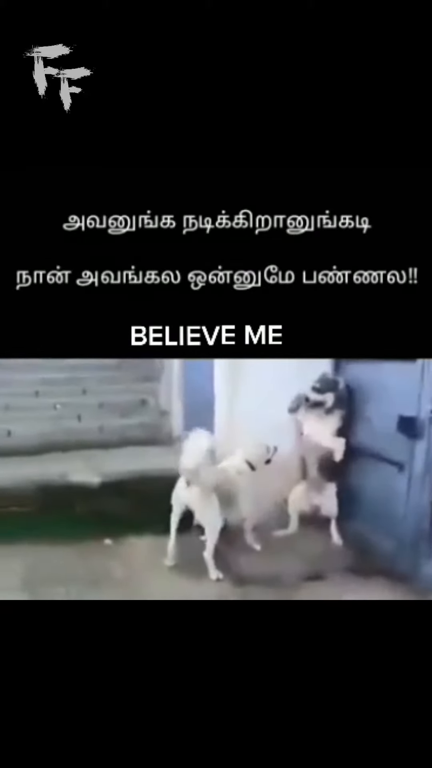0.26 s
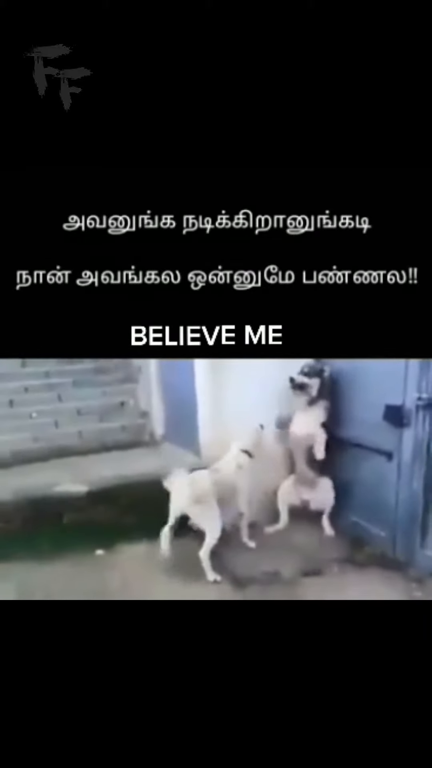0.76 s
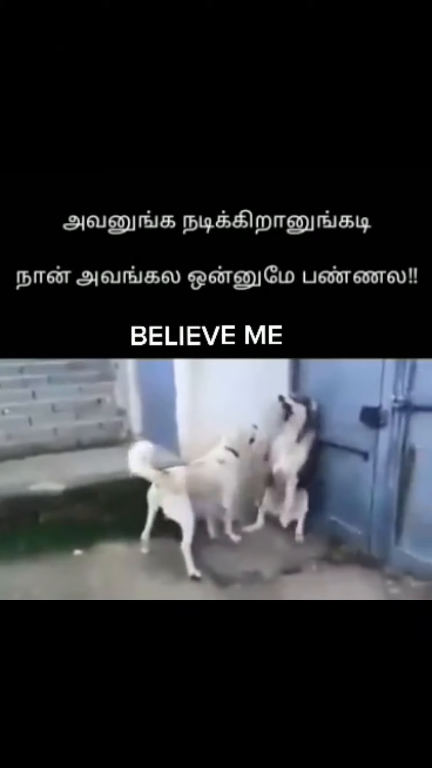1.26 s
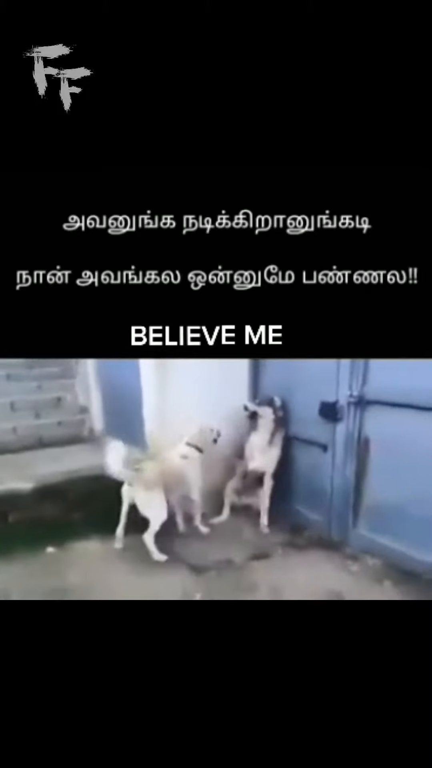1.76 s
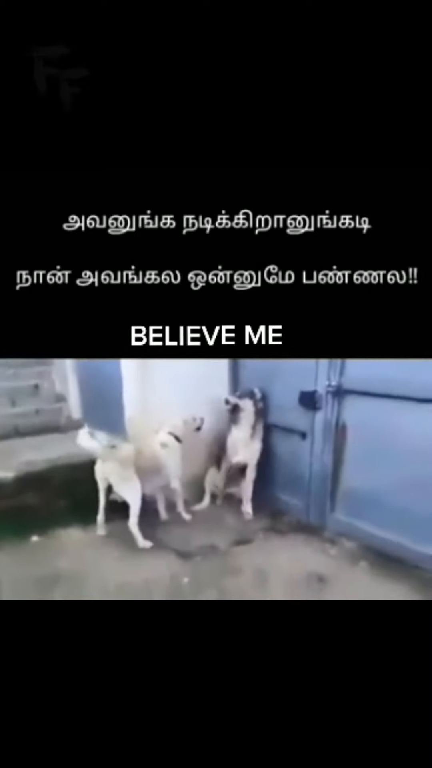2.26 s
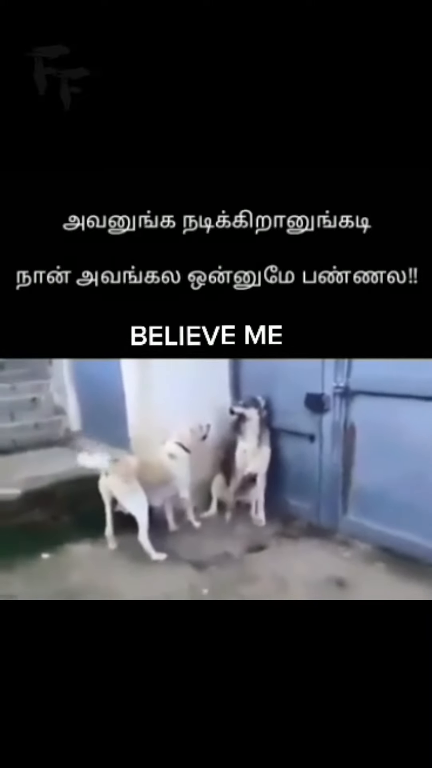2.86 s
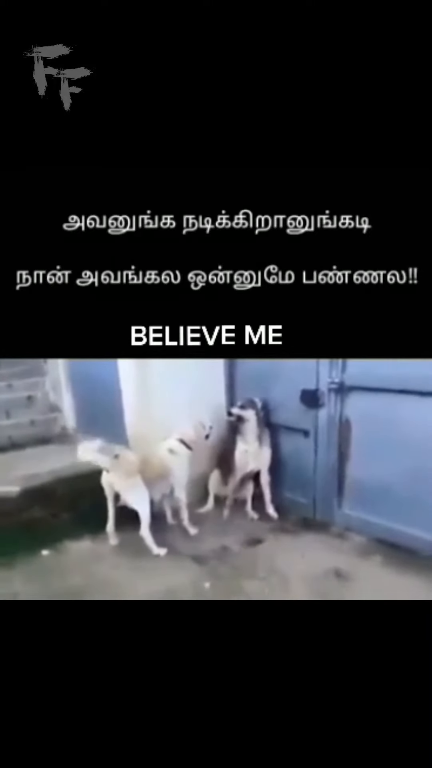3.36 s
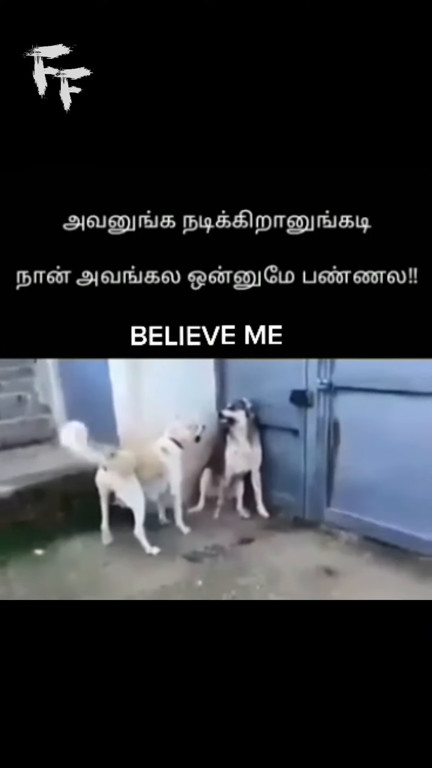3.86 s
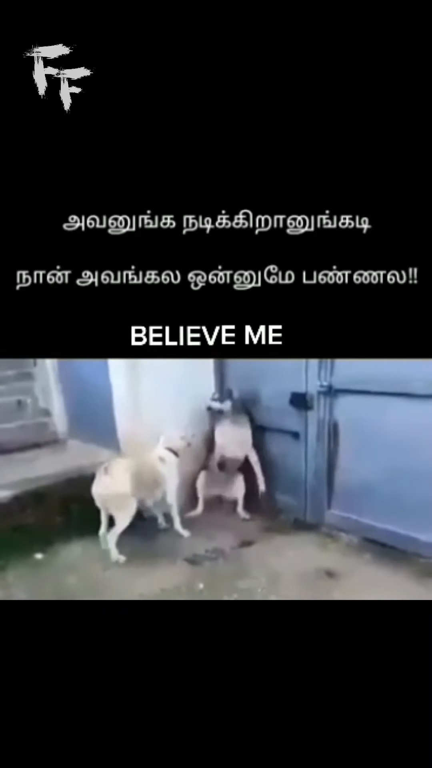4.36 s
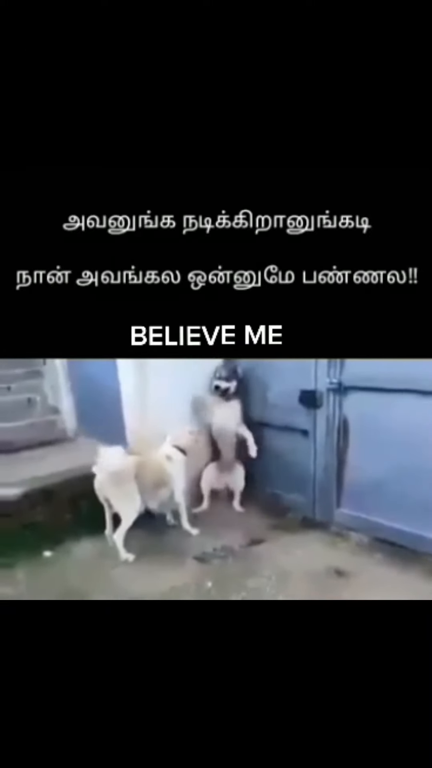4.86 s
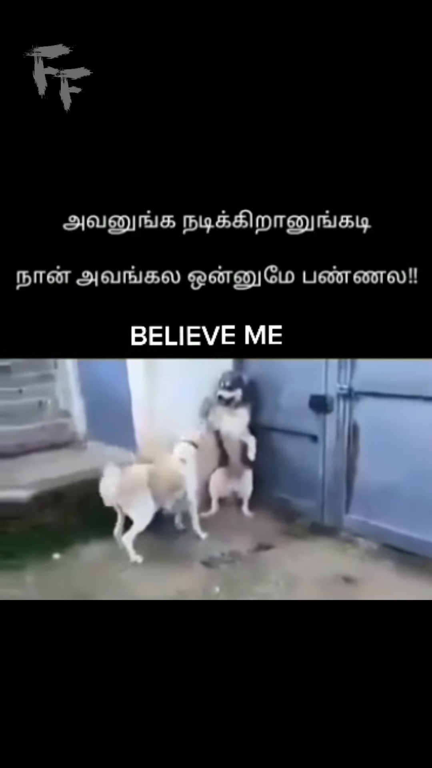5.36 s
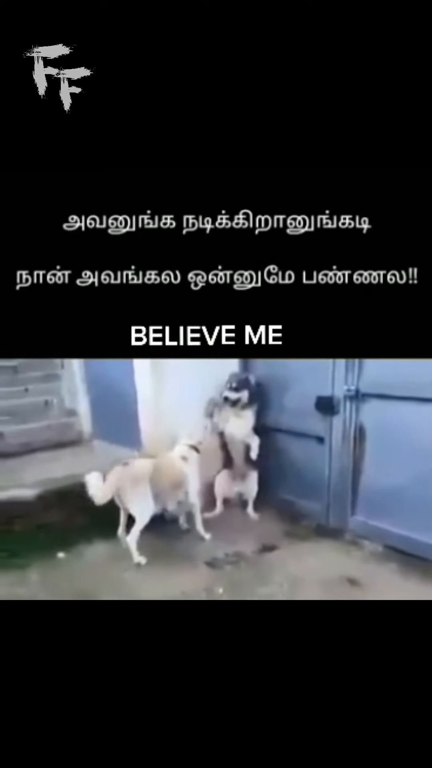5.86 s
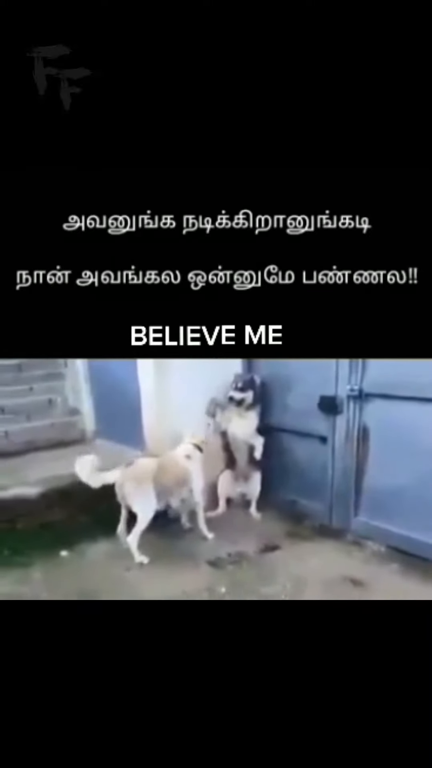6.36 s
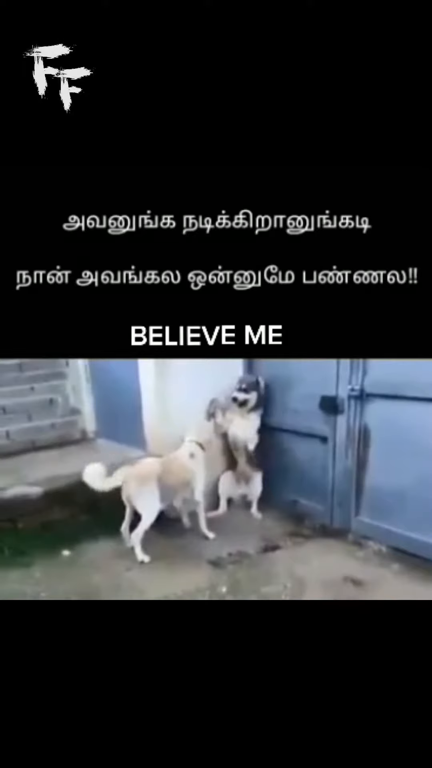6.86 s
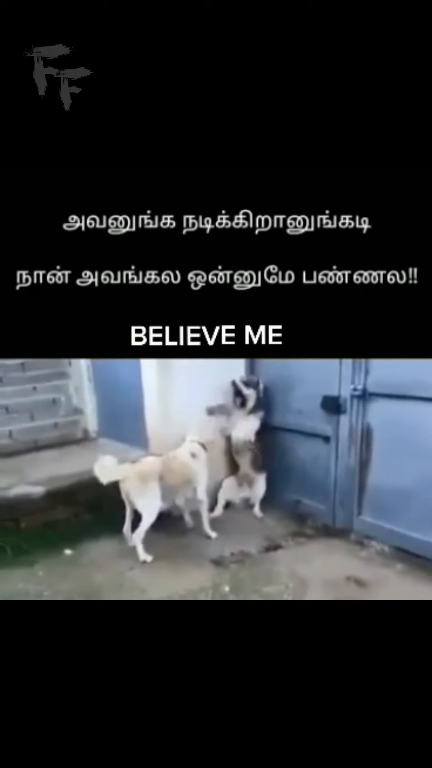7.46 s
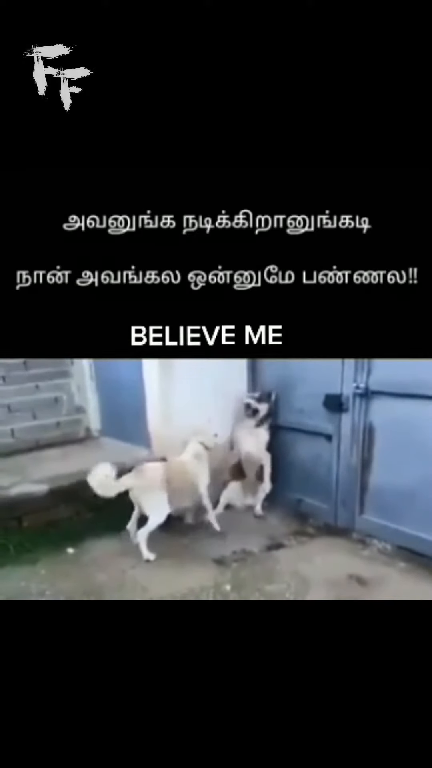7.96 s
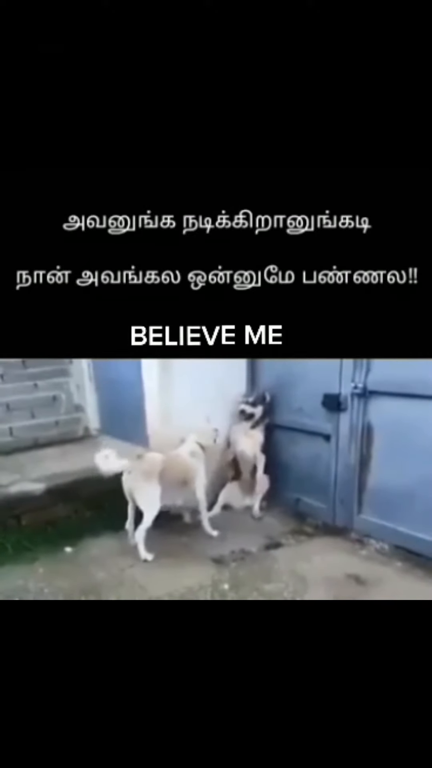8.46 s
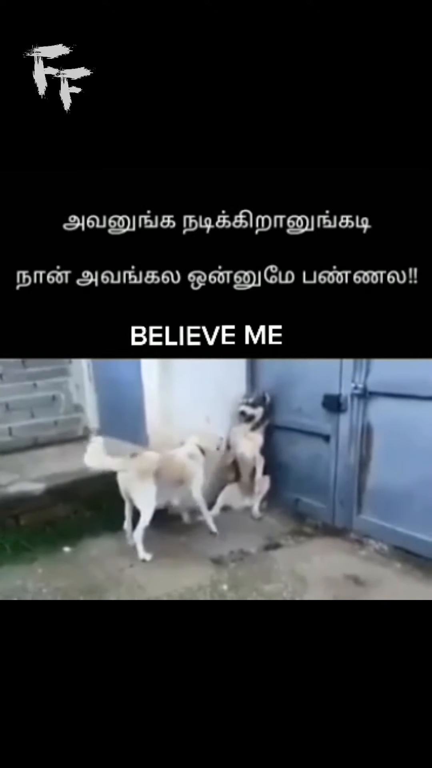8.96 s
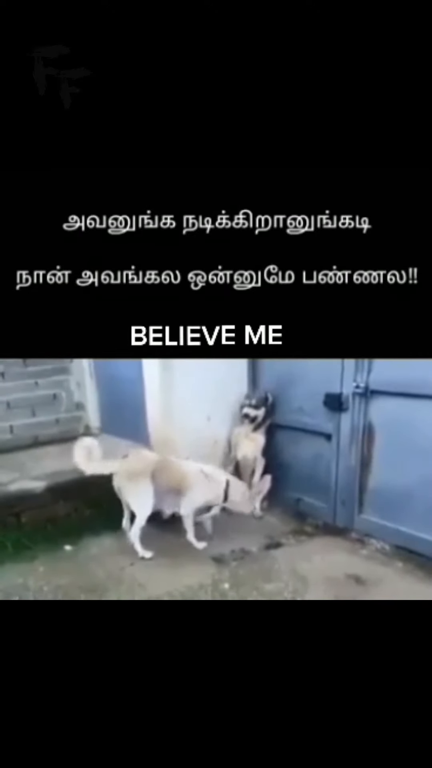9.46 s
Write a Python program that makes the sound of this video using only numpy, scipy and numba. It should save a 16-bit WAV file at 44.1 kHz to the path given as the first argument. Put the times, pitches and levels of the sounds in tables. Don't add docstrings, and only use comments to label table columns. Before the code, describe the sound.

A cornered dog squeals and barks hoarsely while an attacker snarls without pause and fires loud, clipped barks, captured on an overloaded phone.

```python
import sys
import numpy as np
from scipy import signal
from scipy.fft import rfft, irfft
from scipy.io import wavfile
from scipy.ndimage import uniform_filter1d, minimum_filter1d
from numba import njit

SR = 44100
rng = np.random.default_rng(int(sys.argv[2]) if len(sys.argv) > 2 else 0)


def linear_from_db(decibels):
    return 10 ** (np.asarray(decibels, float) / 20)


def wav_out(sig):
    wavfile.write(sys.argv[1], SR, np.round(np.clip(np.atleast_2d(sig).T, -1, 1) * 32767).astype(np.int16))


N = 429086

# start_s, peak_db
TICKS = [
    (1.791, -52),
    (6.009, -50),
    (7.531, -50.5),
]
# start_s, length_s, snarl_db, teeth_hiss_db
BREATHS = [(0.0, 0.22, -39.5, -40), (0.277, 0.13, -46.5, -38), (0.434, 0.11, -38, -37),
           (0.563, 0.084, -39.5, -45), (0.96, .19, -34.5, -31.5), (1.323, 0.24, -34, -33),
           (1.684, 0.51, -44.5, -52.5), (1.962, 0.24, -40.5, -40), (2.228, 0.17, -44, -58),
           (2.413, 0.2, -42, -43.5), (2.656, 0.092, -45.5, -47.5), (2.809, 0.15, -39.5, -41.5),
           (3.338, 0.22, -42, -42), (3.7, 0.18, -43.5, -48.5), (3.926, 0.3, -42.5, -41.5),
           (4.593, 0.04, -38, -35), (4.868, 0.33, -40.5, -47), (5.248, 0.25, -38.5, -45),
           (5.708, 0.18, -36, -36.5), (6.0, 0.49, -42.5, -39.5), (6.815, 0.24, -37, -38.5),
           (7.1, 0.15, -45, -45.5), (7.225, 0.21, -42, -41), (7.491, 0.34, -41.5, -48),
           (7.962, 0.27, -33, -37.5), (8.183, 0.11, -32.5, -47), (8.6, 0.18, -46.5, -47.5),
           (8.758, 0.18, -40, -37.5), (8.974, 0.28, -43, -43), (9.557, 0.17, -45.5, -49)]
# time_s, level_db
CHEST = [(0.0, -40), (0.19, -44), (1.22, -43), (1.81, -44.5), (2.27, -38), (3.55, -47), (4.09, -40),
         (5.04, -43), (5.39, -27), (5.83, -40.5), (6.45, -39.5), (7.02, -45.5), (7.67, -31.5), (8.1, -44.5),
         (8.97, -33.5), (9.73, -45)]
# time_s, pitch_hz, level_db
HUMS = [
    [(2.0, 98.77, -48), (2.116, 97.5, -46), (2.344, 86.82, -37), (2.404, 80.1, -43), (2.506, 80.15, -46),
     (2.62, 65.8, -37)],
    [(4.95, 152, -45), (5.003, 152.2, -39.5), (5.196, 109.6, -38.5), (5.362, 118.6, -29.5),
     (5.534, 95.01, -32), (5.6, 102.8, -51)],
    [(7.35, 76.7, -40), (7.564, 78.8, -46.5), (7.66, 100.1, -28), (7.75, 101.2, -37)],
    [(8.33, 116.4, -33), (8.408, 106.4, -41.5), (8.566, 106.4, -38), (8.752, 82, -44), (8.966, 78.2, -43.5),
     (9.0, 83.4, -39)],
]
# centre_hz, width_hz, level_db
SNARL_THROAT = [(539, 224, 6), (985, 600, 4), (1760, 1070, 0)]
# centre_hz, width_hz, level_db
SNARL_TEETH = [(2257, 138, -1), (2670, 200, 1.5), (3106.6, 1340, -5.5), (3712, 990, -3.5), (4420, 1000, -9)]
# time_s, pitch_hz, level_db, octave_rel_db
YELPS = [
    [(0.095, 1403, -28, -8), (0.136, 1770, -15, -8), (0.145, 1820, -22, -5), (0.162, 1885, -9.5, -13),
     (0.192, 1888, -12, -14), (0.203, 1860, -23, -6), (0.231, 1745, -14, -13), (0.254, 1610, -20, -12),
     (0.295, 1760, -58, -15)],
    [(0.31, 1545, -35, -18), (0.336, 1494, -26.5, -27), (0.395, 1490, -44, -17)],
    [(0.785, 1634, -28.5, -13.5), (0.851, 2027, -8, -3.5), (0.875, 1890, -40.5, -10)],
    [(1.335, 1603, -44, 5), (1.365, 1603, -36.5, 7), (1.415, 1922, -19.5, -10), (1.432, 1768, -24, -1.5),
     (1.47, 1745, -35.5, 0.5)],
]
# start_s, length_s, level_db, low_resonance_hz, jaw_opening_db
SHARP_BARKS = [
    (0.79, 0.12, -8, 612.6, 2),
    (1.845, 0.1, -11, 672.2, -1.5),
    (3.186, .117, -9, 621, 0.5),
    (4.381, 0.11, -11, 571, 1),
    (5.517, 0.12, -11, 726, 3),
    (6.668, .124, -10, 713.8, 0.5),
    (7.728, .185, -9.5, 653.3, 1),
    (9.362, 0.11, -8, 571.9, 1),
]
# start_s, length_s, level_db, low_resonance_hz, jaw_opening_db
HOARSE_BARKS = [
    (0.45, 0.058, -30, 544.6, -9.5),
    (1.147, .16, -15, 639.5, 3),
    (1.435, 0.15, -17.5, 618, 4),
    (4.505, 0.068, -6, 570.9, 2.5),
    (4.715, .115, -16.5, 578, 1),
    (8.028, .14, -14.5, 644.7, -2.5),
    (8.222, 0.055, -20.5, 507.6, -11.5),
    (8.382, .165, -19, 603.3, 2),
    (9.512, .04, -21.5, 555, -9),
]
# length_share, plus_s, low_db, low_pitch_factor, mouth_rel_db, mouth_hz, edge_rel_db
SHARP_COURSE = [(0.0, -.004, -26, .98, -8, 900, -24), (.06, 0.0, -11, .99, -7, 910, -24),
                (.18, .003, 0.3, 1.02, -3, 950, -12), (.68, .001, -3, 1.02, 3, 1200, -8),
                (1, 0, -12, 1.01, 11, 1450, 1), (1, .015, -28, .99, 10, 1380, -1),
                (1, .085, -43, .97, 4, 1300, -4)]
HOARSE_COURSE = [(0, 0, -11, 1.06, -7.5, 903, -18), (.35, 0.00056, -3, 1.06, 3, 938, -11.5),
                 (1, 0.0015, -5.5, .95, 3, 1270, -10.5), (1.002, .025, -31, .95, -0.5, 1170, -10.5),
                 (1, .07, -19.5, .95, -22, 1270, -21.5)]
# centre_hz, width_hz, level_db
BARK_EDGE = [(2190, 320, 6), (2534, 180, 5.5), (2962, 390, 1.5), (3530, 300, 1.5), (3863, 350, 0.5)]
# start_s, length_s, pitch_hz, level_db
LOCKS = [(1.157, 0.0073, 844, -10.5), (1.17, 0.054, 884, -12), (1.256, 0.039, 553, -12.5),
         (1.465, 0.058, 677, -14.5), (1.509, 0.013, 571, -6), (1.541, 0.042, 565, -16.5),
         (1.867, 0.025, 757, -13), (1.893, 0.023, 624, -9.5), (1.905, 0.024, 1021, -11.5),
         (3.224, 0.03, 636, -7.5), (3.247, 0.015, 613, -16.5), (4.399, 0.03, 568, -5),
         (4.48, 0.013, 622, -9.5), (4.52, 0.074, 566, -9.5), (4.769, 0.052, 575, -11),
         (4.828, 0.021, 560, -21), (5.528, 0.058, 775, -14.5), (5.606, 0.033, 1168, -9.5),
         (6.747, 0.011, 1200, -2), (7.777, 0.0076, 644, -9.5), (7.844, 0.0073, 1018, -4.5),
         (8.056, 0.024, 716, -18.5), (8.092, 0.011, 619, -14), (8.177, 0.027, 499, -27),
         (8.474, 0.054, 613, -17), (9.368, 0.022, 939, -11), (9.402, 0.049, 555, -7),
         (9.418, 0.029, 856, -5)]
# frequency_hz, density_db (per Hz)
TREBLE = [(2710, -25.5), (4600, -5.5), (6180, -6.5), (7240, -12), (7860, -17), (11000, -25.5),
          (12800, -35.5), (16700, -51), (22000, -120)]
# frequency_hz, chance (0-1)
DROPPED = [(2000, .0), (2550, .05), (2680, .27), (2820, .1), (3400, .12), (3800, .3), (4200, .58),
           (4400, .85), (4600, .9), (4750, .35), (13000, .45)]

# chaotic share of the airflow (0-1), chest_rel_db, windpipe_rel_db
SHARP_VOICE, HOARSE_VOICE = (1, -14.5, -5), (1, -11, 0.5)
LOCK_FADE_S, LOCK_DUCK_DB, LOCK_OCTAVE_DB = 0.012, -3.5, -17.5
GLIDE_ROUGH_HZ_S, STEADY_VEIL_DB, GLIDING_VEIL_DB = 5800, -21.5, -6.5
BREATH_RISE_DB_S, BREATH_FALL_DB_S, HELD_BREATH_DB = 251, 141.5, -58
BREATH_ARCH_DB, TEETH_WANDER = 1.5, 0.077
CHEST_FOLLOWS = 0.24
YARD_T60_S, YARD_DB = 0.18, -14
PHONE_CUT_HZ = 4700
TREBLE_DB, TREBLE_FOLLOWS, TREBLE_SMOOTH_S = -66.5, 1.35, .035
TREBLE_FLOOR_DB = -82


def rms_one(x):
    return x / np.sqrt(np.mean(x ** 2) + 1e-20)


def in_time(rows):
    s, *columns = np.transpose(rows)
    return [np.interp(np.arange(N) / SR, s, c) for c in columns]


def while_calling(calls):
    t = np.arange(N) / SR
    inside = [np.minimum(t - call[0][0] + .003, call[-1][0] + .007 - t) / .01 for call in calls]
    return np.clip(np.max(inside, axis=0), 0, 1)


def drift(rate_hz):
    r = np.exp(-2 * np.pi * rate_hz / SR)
    smoother = [[0.68, 0.005, 0.015, 1, -2 * r, r * r]]
    return rms_one(signal.sosfilt(smoother, rng.standard_normal(N + SR))[SR:])


def band(x, low_hz, high_hz, order=2):
    return signal.sosfilt(signal.butter(order, [low_hz, high_hz], "band", fs=SR, output="sos"), x)


def evened(x, span_s=0.025):
    return x / np.sqrt(uniform_filter1d(x ** 2, int(span_s * SR)) + 1e-12)


@njit
def two_pole(x, c1, c2):
    y = np.zeros(len(x))
    for i in range(2, len(x)):
        y[i] = x[i] - x[i - 2] + c1[i] * y[i - 1] - c2 * y[i - 2]
    return y


def resonance(x, hz, width_hz):
    r = np.exp(-np.pi * width_hz / SR)
    turn = 2 * r * np.cos(2 * np.pi * hz / SR) + np.zeros(N)
    return (1 - r * r) / 2 * two_pole(x, turn, r * r)


def throat(x, modes):
    return sum((-1) ** k * linear_from_db(db) * resonance(x, hz, width) for k, (hz, width, db) in enumerate(modes))


def folds(hz, jitter, shimmer_db, rough, gate):
    cycles = np.cumsum(hz * np.exp(jitter * drift(120))) / SR
    closings = np.diff(np.floor(cycles), prepend=0)
    pulses = closings * linear_from_db(shimmer_db * drift(140)) * np.sqrt(SR / hz)
    puffs = rms_one(rng.standard_normal(N) * np.exp(-gate * (cycles % 1)))
    return np.sqrt(1 - rough) * pulses + np.sqrt(rough) * puffs


def yard(x):
    t = np.arange(SR // 2) / SR
    tail = rng.standard_normal(len(t)) * linear_from_db(-60 * t / YARD_T60_S) * (t > .006)
    tail = band(tail, 190, 4500, order=1)
    return signal.fftconvolve(x, tail / np.sqrt(np.sum(tail ** 2)))[:N]


def ticks():
    hits = np.zeros(N)
    for start_s, peak_db in TICKS:
        hits[round(start_s * SR)] = linear_from_db(peak_db + 13.5)
    fall = signal.lfilter([1], [1, -np.exp(-1 / (0.041 * SR))], hits + 1e-18)
    return fall * rms_one(band(rng.standard_normal(N), 350, 1900))


def breathing():
    t = np.arange(0, N, 32)[:, None] / SR
    s, length, *levels = np.transpose(BREATHS)
    loss = BREATH_RISE_DB_S * np.maximum(s - t, 0) + BREATH_FALL_DB_S * np.maximum(t - s - length, 0)
    loss = loss + BREATH_ARCH_DB * np.clip(2 * (t - s) / length - 1, -1, 1) ** 2
    strongest = [np.maximum(np.max(db - loss, axis=1), HELD_BREATH_DB) for db in levels]
    return [np.interp(np.arange(N) / SR, t[:, 0], db) for db in strongest]


def rasp(snarl_db, teeth_db):
    flow = folds(hz=in_time(sum(HUMS, []))[0], jitter=.2, shimmer_db=3.0, rough=.97, gate=.8)
    lips = np.exp(TEETH_WANDER * drift(1.2))
    teeth_modes = [(hz * lips ** (hz < 3500), *rest) for hz, *rest in SNARL_TEETH]
    teeth = linear_from_db(teeth_db) * rms_one(throat(flow, teeth_modes))
    air = linear_from_db(snarl_db) * rms_one(throat(flow, SNARL_THROAT)) + teeth
    air = signal.sosfilt(signal.butter(3, 420, "high", fs=SR, output="sos"), air)
    return linear_from_db(1.92 * drift(18)) * air


def growl():
    snarl_db, teeth_db = breathing()
    chest_db = in_time(CHEST)[0] + CHEST_FOLLOWS * (snarl_db + 44)
    hz, hum_db = in_time(sum(HUMS, []))
    phase = 2 * np.pi * np.cumsum(hz) / SR
    hum = np.sqrt(2) * (np.sin(phase) + 0.11 * np.sin(phase / 2))
    humming = while_calling(HUMS)
    rumble = band(resonance(rng.standard_normal(N), 85, 80), 40, 214) * linear_from_db(3.13 * drift(18))
    rumble_db = np.minimum(chest_db, -33) - 5 * humming
    chest = linear_from_db(rumble_db) * rms_one(rumble)
    chest = chest + humming * linear_from_db(hum_db + 3.3 * drift(8.4)) * hum
    ring = resonance(resonance(hum_flow(hz), 365, 49), 445, 140)
    muzzle = humming * linear_from_db(hum_db - 10.5) * rms_one(ring)
    return chest + muzzle + rasp(snarl_db, teeth_db)


def hum_flow(hz):
    return folds(hz, jitter=.2, shimmer_db=3.0, rough=.97, gate=.8)


def yelps():
    hz, level_db, octave_db = in_time(sum(YELPS, []))
    glide_hz_s = uniform_filter1d(np.abs(np.gradient(hz)) * SR, size=400)
    glide = np.clip(glide_hz_s / GLIDE_ROUGH_HZ_S, 0, 1)
    fray = linear_from_db(STEADY_VEIL_DB + (GLIDING_VEIL_DB - STEADY_VEIL_DB) * glide)
    phase = 2 * np.pi * np.cumsum(hz * np.exp(0.0062 * drift(51))) / SR
    first, second = (1 + k * fray * drift(110) for k in (1, 1.6))
    tone = np.sqrt(2) * (first * np.sin(phase) + second * linear_from_db(octave_db) * np.sin(2 * phase))
    breath = rms_one(band(rng.standard_normal(N), 1300, 4000))
    return while_calling(YELPS) * linear_from_db(level_db) * (tone + linear_from_db(-8) * fray * breath)


def bark_courses():
    dogs = [(SHARP_BARKS, SHARP_COURSE, SHARP_VOICE), (HOARSE_BARKS, HOARSE_COURSE, HOARSE_VOICE)]
    calls = []
    for rows, course, voice in dogs:
        for s, length, db, hz, jaw in rows:
            calls.append([(s + share * length + plus, db + low, hz * factor, mouth + jaw, mouth_hz,
                           edge + jaw, *voice)
                          for share, plus, low, factor, mouth, mouth_hz, edge in course])
    calls = sorted(calls)
    following = calls[1:] + [[[np.inf]]]
    return [[row for row in call if row[0] < after[0][0]] for call, after in zip(calls, following)]


def locks():
    t = np.arange(N) / SR
    tone, held = np.zeros(N), np.zeros(N)
    waver = np.cumsum(.03 * drift(60)) / SR
    for s, length, hz, db in LOCKS:
        at = slice(int((s - LOCK_FADE_S) * SR), int((s + length + LOCK_FADE_S) * SR))
        inside = np.minimum(t[at] - s, s + length - t[at])
        shape = np.clip(inside / LOCK_FADE_S / 2 + .5, 0, 1)
        phase = 2 * np.pi * hz * (t[at] + waver[at])
        tone[at] += linear_from_db(db) * shape * np.sqrt(2) * (np.sin(phase) + linear_from_db(LOCK_OCTAVE_DB) * np.sin(2 * phase))
        held[at] = np.maximum(held[at], shape)
    return tone * linear_from_db(1.76 * drift(90)), held


def barks():
    calls = bark_courses()
    tone, held = locks()
    low_db, low_hz, mouth_db, mouth_hz, edge_db, rough, chest_db, pipe_db = in_time(sum(calls, []))
    flow = folds(low_hz, jitter=.05, shimmer_db=3.0, rough=np.clip(rough, .05, .7), gate=2.5)
    low = evened(resonance(resonance(flow, low_hz, 150), low_hz, 870))
    mouth = resonance(flow, mouth_hz, 300)
    mouth = mouth - linear_from_db(2.5) * resonance(flow, 0.733 * mouth_hz, 140)
    mouth = mouth - linear_from_db(-4) * resonance(flow, 1.644 * mouth_hz, 170)
    mouth = evened(resonance(mouth, 0.56 * mouth_hz, 2000))
    low, mouth = (part * linear_from_db(3.2 * drift(20)) for part in (low, mouth))
    edge = evened(band(throat(flow, BARK_EDGE), 1800, 4500))
    chest = evened(band(flow, 297, 468), span_s=0.14)
    pipe = evened(resonance(resonance(flow, 558.0, 62), 482, 450), span_s=0.25)
    upper = linear_from_db(edge_db - 0.59 * LOCK_DUCK_DB * held) * edge + linear_from_db(mouth_db) * mouth
    voice = low + upper + linear_from_db(chest_db) * chest - linear_from_db(pipe_db) * pipe
    return tone + linear_from_db(LOCK_DUCK_DB * held) * while_calling(calls) * linear_from_db(low_db) * voice


def scene():
    voices = barks() + yelps() + ticks()
    mono = voices + linear_from_db(YARD_DB) * yard(voices) + growl()
    return np.tile(mono, (2, 1))


def overload(x):
    peaks = -minimum_filter1d(-np.abs(x), int(.003 * SR))
    held = x / np.maximum(1, uniform_filter1d(peaks, int(.002 * SR)) / .93)
    return held + 0.33 * band(held ** 2, 26, 580, order=1)


def treble_hiss(voice):
    hz = np.fft.rfftfreq(N, 1 / SR)[1:]
    treble_hz, treble_db = np.transpose(TREBLE)
    colour = linear_from_db(np.interp(np.log(hz), np.log(treble_hz), treble_db)) * (hz > 4600)
    colour = np.append(0, colour)
    mid, side = (rms_one(irfft(rfft(rng.standard_normal(N)) * colour, N)) for _ in range(2))
    power = uniform_filter1d(band(voice, 2133, 2840, order=4) ** 2, int(TREBLE_SMOOTH_S * SR))
    level_db = TREBLE_DB + TREBLE_FOLLOWS * (10 * np.log10(np.abs(power) + 1e-9) + 45)
    return (linear_from_db(level_db) + linear_from_db(TREBLE_FLOOR_DB)) * (mid + linear_from_db(-9) * side * [[1], [-1]])


def mute_weak_lines(x, weakest=0.89):
    hz, _, frames = signal.stft(x, SR, nperseg=2048, noverlap=1536)
    size = np.abs(frames[0] + frames[1])
    weak = (size < weakest * uniform_filter1d(size, size=9, axis=0)) & (hz[:, None] > 1900)
    chance = rng.random((len(hz) // 5 + 1, size.shape[1] // 8 + 1))
    chance = np.repeat(np.repeat(chance, repeats=5, axis=0), repeats=8, axis=1)
    chance = chance[:len(hz), :size.shape[1]]
    tonal = uniform_filter1d(size, size=5, axis=0) > 2.5 * uniform_filter1d(size, size=45, axis=0)
    dropped = (chance < np.interp(hz, *np.transpose(DROPPED))[:, None]) & ~tonal
    return signal.istft(frames * ~(weak | dropped), SR, nperseg=2048, noverlap=1536)[1][:, :N]


def roll_off(x):
    return signal.sosfilt(signal.butter(12, 12960, fs=SR, output="sos"), x)


def record(dry):
    steep_cut = signal.cheby2(12, 50, PHONE_CUT_HZ, fs=SR, output="sos")
    voice = signal.sosfilt(steep_cut, overload(dry[0]))
    mix = mute_weak_lines(voice + treble_hiss(voice))
    return roll_off(np.clip(mix, -1, 1))


dry = scene()
out = record(dry)
wav_out(out)
```